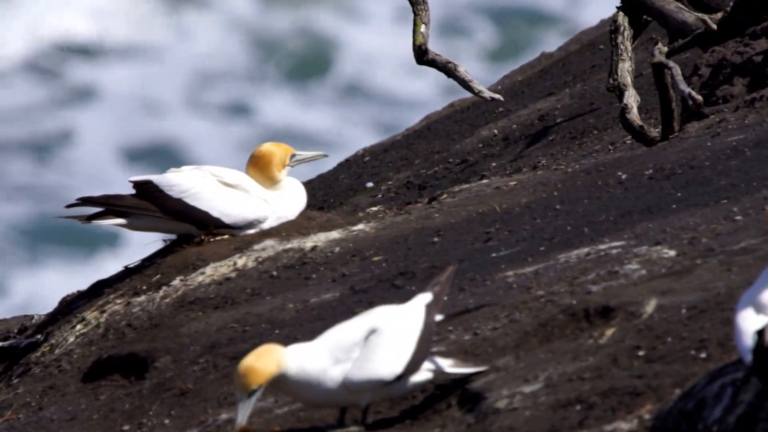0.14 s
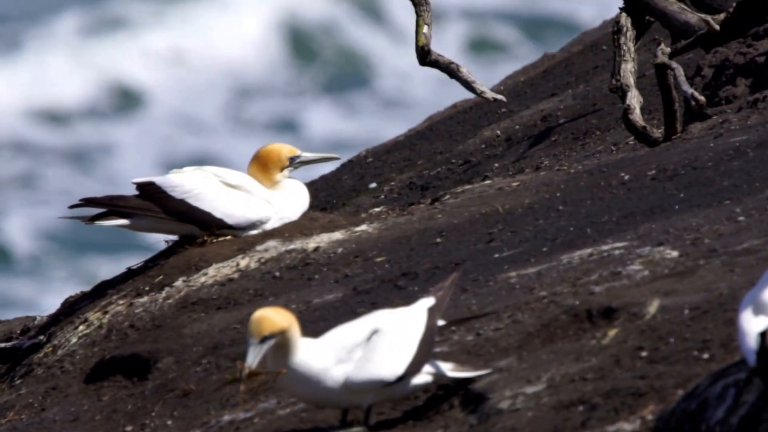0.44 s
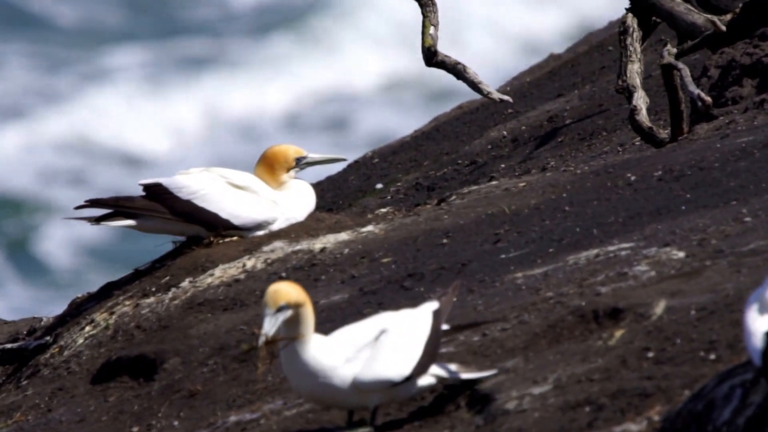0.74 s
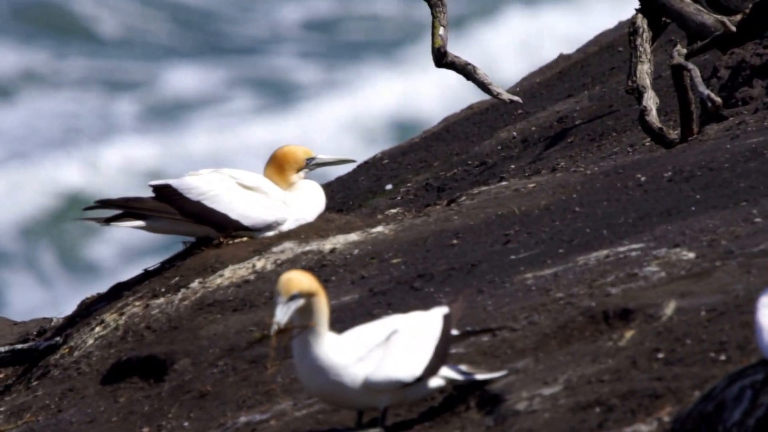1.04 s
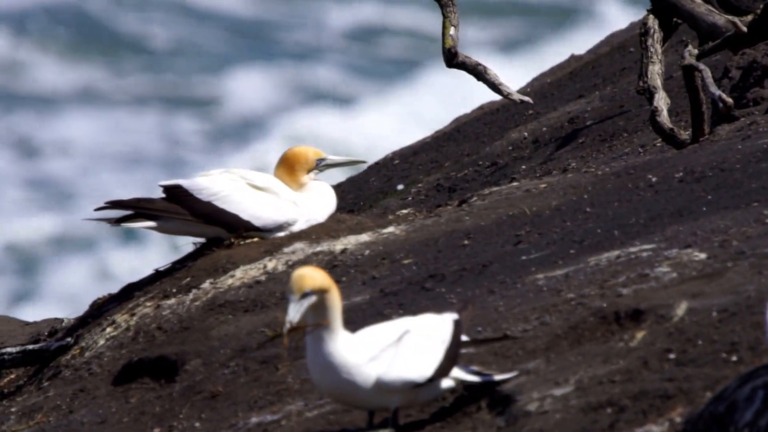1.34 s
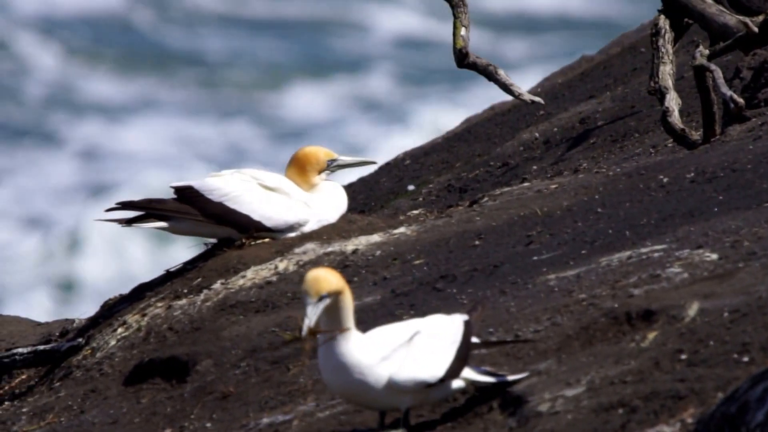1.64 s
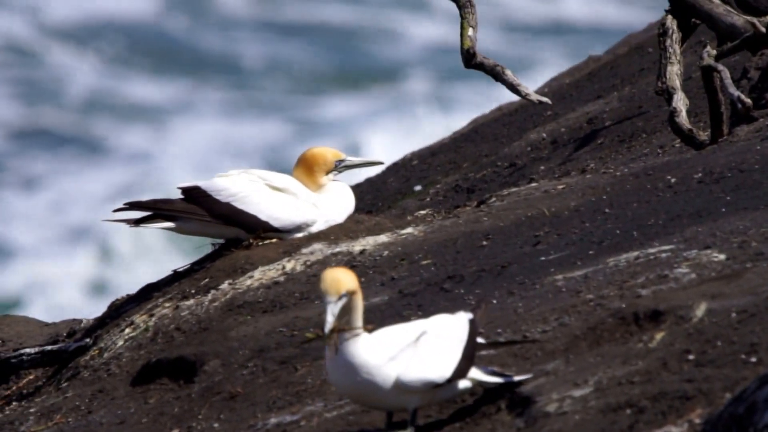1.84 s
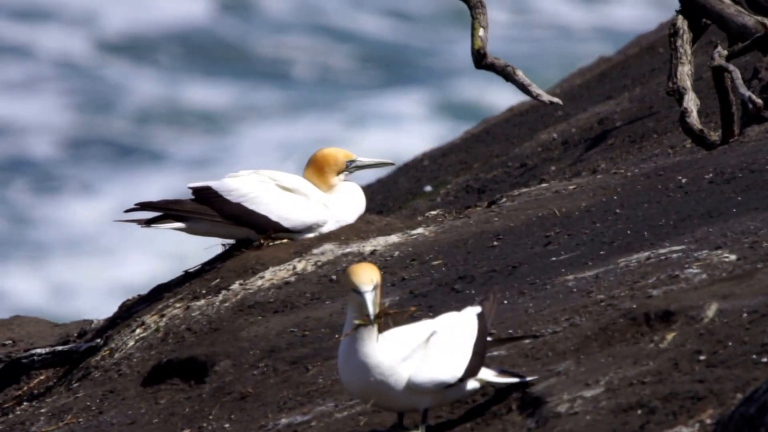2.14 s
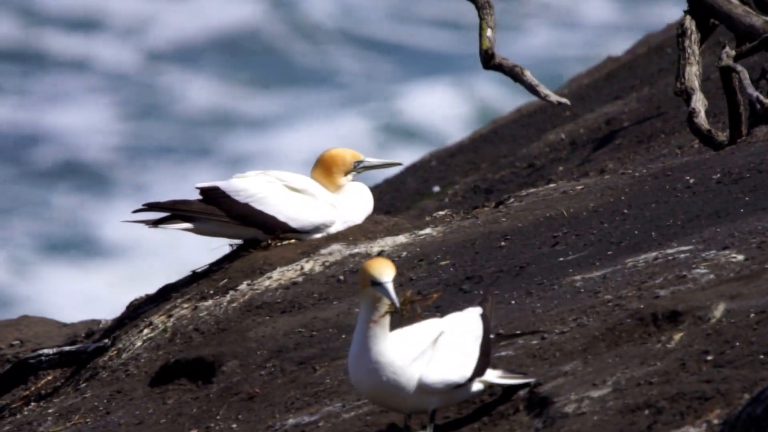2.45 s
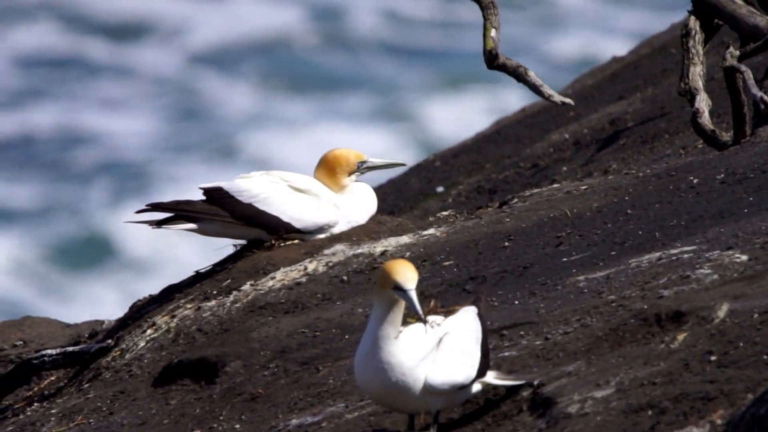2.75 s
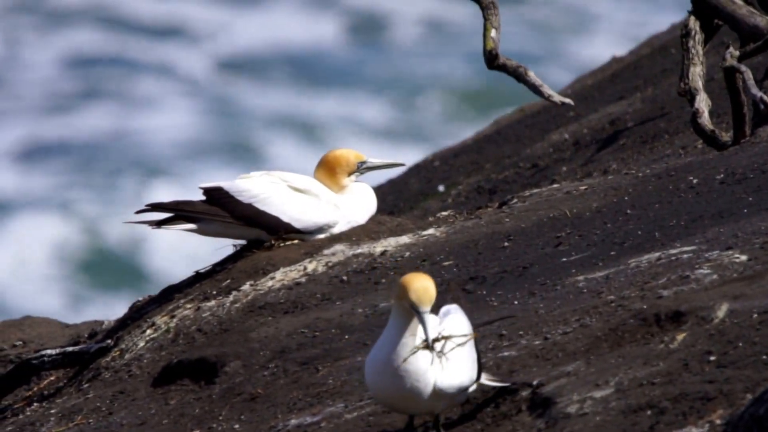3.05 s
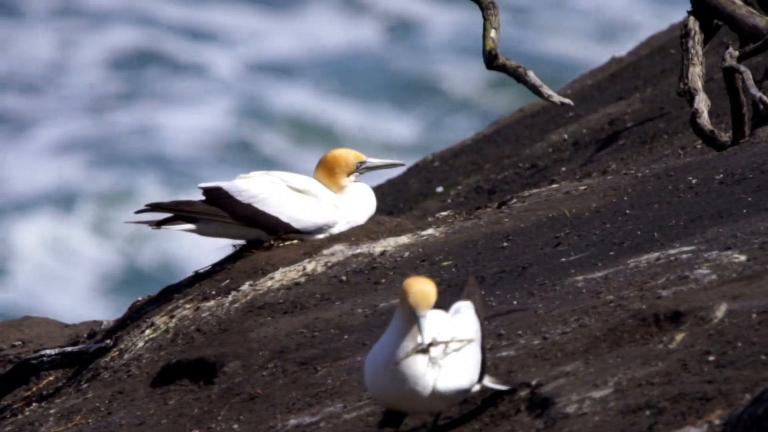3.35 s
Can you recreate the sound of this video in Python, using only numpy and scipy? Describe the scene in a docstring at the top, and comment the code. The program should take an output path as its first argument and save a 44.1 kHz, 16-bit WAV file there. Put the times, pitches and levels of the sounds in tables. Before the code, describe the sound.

Seabirds call off to the left in a coastal colony, with high falling whistles, rattling rasps and fainter gull yelps overlapping throughout. Surf washes steadily below the rocks while gusts of wind rumble and thump on the microphone.

```python
"""Terns whistle and rasp in a cliff colony, off to the left, with gulls yelping farther away.
Each call is an oscillation of the syrinx: amplitude and frequency modulation trill the falling whistles,
throat resonances filter a rattling pulse train into rasps, and three harmonics form each yelp.
The rocks scatter a short reverberation. Below, surf washes steadily as broadband noise,
while turbulent eddies in the wind rumble and thump on the microphone."""
import sys
import numpy as np
from scipy import signal
from scipy.fft import rfft, irfft
from scipy.io import wavfile
from scipy.ndimage import map_coordinates

SR = 44100
rng = np.random.default_rng(int(sys.argv[2]) if len(sys.argv) > 2 else 0)


def to_wav(s):
    """Save 16-bit WAV."""
    ch = np.atleast_2d(s).T  # columns
    pcm = np.round(np.clip(ch, -1, 1) * 32767)  # PCM
    wavfile.write(sys.argv[1], SR, pcm.astype(np.int16))


N = 153909
PORT_LAG_S, EDDY_LAG_S = 5.2e-5, 0.00094  # left port to right port: sound, drifting eddies


def undb(db):
    """Decibels to amplitude ratio."""
    return 10 ** (np.asarray(db) / 20)


def unit(x):
    """Normalisation to rms 1."""
    return x / np.sqrt(np.mean(x ** 2) + 1e-18)


def wander(rate_hz, size):
    """Interpolated noise: a smooth random curve with a spread near 1."""
    knots = np.random.default_rng(rng.integers(1 << 30)).standard_normal(int(size * rate_hz / SR) + 4)
    return map_coordinates(knots, [1 + np.arange(size) * rate_hz / SR], order=2, mode="mirror")


def bin_hz():
    """Frequencies of the spectrum bins, at least 1 Hz."""
    return np.maximum(np.arange(N // 2 + 1) * SR / N, 1)


def spectral_gain(points):
    """Spectral envelope: gain per bin from (frequency_hz, level_db) points."""
    hz, db = np.array(points).T
    return undb(np.interp(np.log(bin_hz()), np.log(hz), db))


def resonate(x, hz, width_hz):
    """Resonance with steep skirts: two band-passes in cascade."""
    b, a = signal.iirpeak(min(hz, SR / 3), hz / width_hz, fs=SR)
    return signal.lfilter(b, a, signal.lfilter(b, a, x))


def add(out, start_s, x):
    """Superposition: mix a sound in at its time."""
    i = max(int(start_s * SR), 0)
    n = max(min(x.shape[-1], N - i), 0)
    out[..., i:i + n] += x[..., :n]


def note(length_s, attack_s=0.0051, release_s=0.015):
    """Time, progress 0-1 and attack-hold-release envelope of one call."""
    t = np.arange(int(max(length_s, .01) * SR)) / SR
    ramp = np.clip(np.minimum(t / attack_s, (t[-1] - t) / release_s), 0, 1)
    return t, t / t[-1], np.sin(np.pi / 2 * ramp) ** 2


def phase_of(hz):
    """Phase in radians, the integral of frequency."""
    return 2 * np.pi * np.cumsum(hz) / SR


def from_left(x, lag_s):
    """Travel delay: what comes from the left reaches the right port later."""
    return np.array([x, irfft(rfft(x) * np.exp(-2j * np.pi * bin_hz() * lag_s), N)])


# Spectral density of the surf: frequency_hz, relative_db
SURF_SPECTRUM = [(40, -30), (200, -3), (1000, 1.5), (1600, -4), (2600, -8.5), (3700, -12), (5500, -9.5),
                 (7200, -17.5), (9000, -19.5), (11000, -30), (16000, -32.5)]
# Level difference of the surf between the ears: frequency_hz, left_minus_right_db
SURF_BALANCE = [(300, -7), (700, 2.5), (1300, 2.5), (2400, 6.5), (5000, 4), (12000, -0.5)]


def surf(level_db=-42.5, coherence=0.74):
    """Partial coherence: distant waves make an even wash of noise, mostly common to both ears."""
    common = from_left(rng.standard_normal(N), PORT_LAG_S)
    noise = np.sqrt(coherence) * common + np.sqrt(1 - coherence) * rng.standard_normal((2, N))
    balance = spectral_gain(SURF_BALANCE)
    spectrum = rfft(noise) * spectral_gain(SURF_SPECTRUM) * np.sqrt([balance, 1 / balance])
    return undb(level_db) * unit(irfft(spectrum, N))


# Spectral density of the wind's rumble: frequency_hz, relative_db
WIND_SPECTRUM = [(15, -43), (30, -10.5), (60, -4), (130, -0.5), (220, -5), (320, -10), (480, -17.5),
                 (800, -30), (2000, -86)]
# Gust strength: time_s, relative_db
GUST_LEVELS = [(0, -26.5), (.15, -33.5), (.29, -27), (.42, -25), (.52, -34), (.76, -29), (.87, -33.5),
               (1.2, -31), (1.3, -41.5), (1.64, -41.5), (1.711, -27.5), (1.81, -41), (1.94, -33.5),
               (2.29, -42), (2.35, -31), (2.63, -35), (2.72, -42.5), (2.92, -30), (3.0, -38), (3.08, -25),
               (3.28, -31.5), (3.49, -34.5)]


def wind(gain_db=4, flutter_db=3.5, eddies_per_s=67, coherent_below_hz=85):
    """Turbulent pressure: eddies rumble on each port, and the larger ones drift across both."""
    coherence = 1 / (1 + (bin_hz() / coherent_below_hz) ** 2)
    common = rfft(from_left(rng.standard_normal(N), EDDY_LAG_S)) * np.sqrt(coherence)
    local = rfft(rng.standard_normal((2, N))) * np.sqrt(1 - coherence)
    rumble = irfft((common + local) * spectral_gain(WIND_SPECTRUM), N)
    flutter = undb(flutter_db * wander(eddies_per_s, N))
    strength_db = np.interp(np.arange(N) / SR, *np.array(GUST_LEVELS).T)
    return unit(rumble * flutter) * undb(strength_db + gain_db)


# Strong eddies striking the microphone: peak_time_s, relative_db, swing_hz, time_constant_s
EDDY_THUMPS = [(.1135, -5.5, 323, 0.0027), (0.215, -8, 190.5, 0.0044), (0.377, -15, 153, 0.0019),
               (0.424, -11, 197, 0.0016), (0.598, -7.5, 258.5, 0.0018), (.771, -15, 148.5, 0.0098),
               (.984, -14.5, 151, 0.0033), (1.675, -11, 173, 0.0017), (2.356, -18.5, 233, 0.0066),
               (2.9522, -8.5, 234, 0.00057), (3.047, -7, 358, 0.00094), (3.126, -13, 163, 0.0039),
               (3.152, -9, 287, 0.0042), (3.167, -7, 166, 0.0017)]


def buffets(gain_db=-3, jitter=0.31):
    """Pressure transients: each strong eddy thumps in one or a few uneven swings, left port first."""
    out, t = np.zeros(N), np.arange(SR // 10) / SR
    middle_s = t.mean()
    for peak_s, db, hz, time_constant_s in EDDY_THUMPS:
        phase = phase_of(hz * (1 + jitter * wander(2 * hz, len(t))))
        thump = np.cos(phase - phase[len(t) // 2]) / np.cosh((t - middle_s) / time_constant_s)
        add(out, peak_s - middle_s, undb(db + gain_db) * thump)
    return from_left(out, EDDY_LAG_S)


# High din of the distant colony: time_s, relative_db
DIN_LEVELS = [(0, -44), (.13, -63.5), (.6, -51.5), (.92, -57), (1.19, -59.5), (1.56, -60), (2.5, -55),
              (2.78, -56.5), (3.49, -57)]


def far_birds(count, yelp_db=-59.5, croak_db=-60.5, croak_hz=1850):
    """Incoherent summation: random whistles overlap into a din, among faint yelps and croaks."""
    din, chatter = np.zeros((2, N))
    for when, length, pitch, glide in rng.random((count * 4, 4)):
        hz = 4500 + 1400 * pitch
        add(din, when * N / SR, tern_whistle(.04 * (1 + length), hz, hz * (.94 - .08 * glide), 0, -14))
    for when, length, pitch, glide, size in rng.random((count, 5)):
        hz, db = 800 + 650 * pitch, yelp_db + 6 * (size - .5)
        add(chatter, when * N / SR, gull_yelp(.04 * (1 + length), hz, hz * (.9 + .2 * glide), db, db))
    for when, length, pitch in rng.random((count, 3)):
        croak = tern_rasp(.04 * (1 + length), croak_db, croak_hz * (1 + pitch / 2), 0)
        add(chatter, when * N / SR, croak)
    din_db = np.interp(np.arange(N) / SR, *np.array(DIN_LEVELS).T)
    return unit(din) * undb(din_db) + chatter


# Gull yelps, levels relative: start_s, length_s, start_hz, end_hz, fundamental_db, octave_db
GULL_YELPS = [(0, 0.094, 1046, 972, -54, -55), (.375, 0.067, 994, 1040, -46, -57),
              (.478, 0.038, 1540, 1535, -46, -68), (.557, 0.034, 1510, 1494, -45, -64),
              (.685, 0.031, 1536, 1534, -47.5, -54), (.705, 0.095, 1000, 1044, -51.5, -59),
              (.8, 0.056, 1270, 1355, -73, -53.5), (1.045, 0.067, 973, 1065, -48, -56),
              (1.238, 0.035, 1053, 1035, -54, -52.5), (1.31, 0.037, 1500, 1610, -48, -58),
              (1.36, 0.1, 1135, 1037, -54, -59), (1.715, 0.058, 1100, 1158, -49, -52),
              (1.828, 0.024, 1185, 1140, -56, -47), (1.972, 0.038, 1150, 1222, -51, -44.5),
              (2.088, 0.073, 1175, 1141, -54, -48), (2.615, 0.07, 960, 946, -56.5, -52.5),
              (2.83, .06, 915, 952, -61, -51), (2.923, 0.036, 961, 961, -54, -52),
              (2.995, 0.041, 947, 864, -54, -49), (3.105, 0.023, 1050, 1070, -61, -46),
              (3.31, 0.077, 886, 956, -49, -49.5), (3.433, 0.02, 1000, 1030, -63, -46)]


def gull_yelp(length_s, start_hz, end_hz, fundamental_db, octave_db,
              arch=0.018, jitter=0.0058, third_db=-10.5, shimmer_db=1.5):
    """Harmonic series: three partials follow an arched glide, made hoarse by jitter and shimmer."""
    t, progress, envelope = note(length_s)
    glide_hz = start_hz + (end_hz - start_hz) * progress
    bend = 1 + arch * (np.sin(np.pi * progress) - .5) + jitter * wander(343, len(t))
    phase = phase_of(glide_hz * bend)
    levels_db = fundamental_db, octave_db, (fundamental_db + octave_db) / 2 + third_db
    harmonics = sum(undb(db) * np.sin(k * phase) for k, db in enumerate(levels_db, 1))
    shimmer = unit(undb(shimmer_db * wander(213, len(t))))
    return np.sqrt(2) * envelope * shimmer * harmonics


# Tern rasps, levels relative: start_s, length_s, level_db, throat_hz, low_resonance_db
TERN_RASPS = [(0, 0.058, -53.5, 4800, -1), (.52, 0.16, -50.5, 5540, -4), (.63, .16, -55.5, 5100, 2),
              (1.315, .13, -51, 5360, -4.5), (1.57, 0.11, -58, 6160, 3.5), (2.16, 0.27, -58.5, 5800, 1.5),
              (2.355, 0.17, -49.5, 5500, -2), (2.48, 0.18, -56.5, 5540, 0), (2.67, 0.1, -55, 5470, 0.5),
              (2.84, 0.13, -57.5, 6140, 3.5), (3.02, 0.15, -56.5, 5700, 3), (3.23, 0.19, -50.5, 5860, 0),
              (3.297, 0.11, -45, 5060, -4), (3.447, 0.099, -49.5, 6100, -0.5)]


def tern_rasp(length_s, level_db, throat_hz, low_resonance_db,
              pitch_hz=712.3, jitter=0.047, cutoff_hz=9500,
              rattle_hz=54.03, rattle_depth=.45, rattle_spread=.25, shimmer_db=1.5):
    """Source and filter: irregular syrinx pulses and air excite two throat resonances, in bursts."""
    t, progress, envelope = note(length_s)
    phase = phase_of(pitch_hz * (1 + jitter * (wander(700, len(t)) + wander(rattle_hz, len(t)))))
    buzz = unit(sum(np.cos(k * phase) for k in range(1, 18)))
    air = wander(SR, len(t))
    source = signal.sosfilt(signal.butter(2, cutoff_hz, fs=SR, output="sos"), buzz + air)
    throat = unit(resonate(source, throat_hz, width_hz=2150))
    low_throat = undb(low_resonance_db) * unit(resonate(source, hz=2660, width_hz=2050))
    rattle_phase = phase_of(rattle_hz * (1 + rattle_spread * wander(rattle_hz, len(t))))
    bursts = (1 - rattle_depth * np.cos(rattle_phase)) * undb(shimmer_db * wander(2 * rattle_hz, len(t)))
    swell = 1 + np.sin(np.pi * progress)
    return undb(level_db) * (throat + low_throat) * unit(bursts * envelope * swell)


# Tern whistles, levels relative: start_s, length_s, start_hz, end_hz, fundamental_db, octave_db
TERN_WHISTLES = [(.16, 0.12, 5200, 4630, -53.5, -72), (.315, 0.059, 4450, 4210, -54, -73),
                 (.375, 0.075, 4660, 4120, -48.5, -73), (.49, 0.095, 4740, 4130, -54, -59),
                 (.625, 0.12, 4720, 4280, -48.5, -58), (1.06, 0.15, 5210, 4470, -50.5, -63),
                 (1.285, 0.17, 4700, 4230, -49.5, -59.5), (1.78, 0.057, 5000, 4600, -59, -75),
                 (1.875, 0.1, 5340, 4500, -47, -65), (1.872, 0.073, 4710, 4050, -44, -57),
                 (2.11, 0.13, 4790, 4310, -48, -61), (2.595, .11, 5240, 4140, -46, -61),
                 (2.68, 0.095, 5100, 4130, -52, -60), (2.94, 0.14, 5000, 4370, -50, -55.5),
                 (3.295, 0.045, 5220, 4330, -49, -59), (3.38, 0.093, 5300, 4250, -49.5, -60)]


def tern_whistle(length_s, start_hz, end_hz, fundamental_db, octave_db,
                 trill_hz=67.9, trill_spread=0.163, trill_depth=.7, trill_bend=0.017,
                 jitter=0.0086, shimmer_db=3, second_ratio=0.92, second_db=-11.5):
    """Amplitude and frequency modulation chop a hoarse falling cry into pulses that bend downwards."""
    t, progress, envelope = note(length_s)
    trill_phase = phase_of(trill_hz * (1 + trill_spread * wander(19.6, len(t))))
    fall = np.expm1(-progress) / np.expm1(-1)  # steepest at the start
    hz = (start_hz + (end_hz - start_hz) * fall) * (1 + trill_bend * np.sin(trill_phase))
    pulses = unit(1 - trill_depth * np.cos(trill_phase)) * undb(shimmer_db * wander(trill_hz, len(t)))
    voices = 0
    # Biphonation: the other side of the syrinx adds a lower, weaker voice.
    for ratio, db in ((1, 0), (second_ratio, second_db)):
        phase = phase_of(hz * ratio * (1 + jitter * wander(840, len(t))))
        voices += undb(db + fundamental_db) * np.sin(phase) + undb(db + octave_db) * np.sin(2 * phase)
    return np.sqrt(2) * envelope * pulses * voices


def colony(left_minus_right_db=9, cliff_db=-8, cliff_t60_s=0.1):
    """Direct and reflected sound: the birds call from the left and the rocks scatter a short tail."""
    t = np.arange(N) / SR
    tail = rng.standard_normal((2, N)) * undb(-60 * t / cliff_t60_s)
    direct = np.zeros(N)
    for table, call, gain_db in ((TERN_WHISTLES, tern_whistle, -3.5), (TERN_RASPS, tern_rasp, 2.5),
                                 (GULL_YELPS, gull_yelp, 2.2)):
        for start_s, *row in table:
            add(direct, start_s, undb(gain_db) * call(*row))
    direct += far_birds(count=45)
    reflected = signal.fftconvolve(direct[None], unit(tail) / np.sqrt(N), axes=1)[:, :N]
    pan = undb(np.array([[.5], [-.5]]) * left_minus_right_db)
    return (from_left(direct, PORT_LAG_S) + undb(cliff_db) * reflected) * pan


def scene():
    """Linear superposition of surf, wind and birds."""
    return surf() + wind() + buffets() + colony()


def record(dry):
    """Band limiting: a steep low-pass removes the treble above 15.8 kHz."""
    return signal.sosfilt(signal.ellip(10, .1, 80, 15800, fs=SR, output="sos"), dry)


dry = scene()
out = record(dry)
to_wav(out)
```